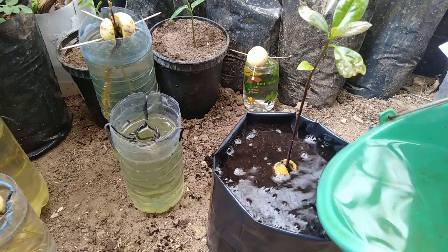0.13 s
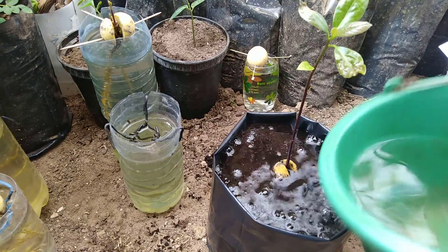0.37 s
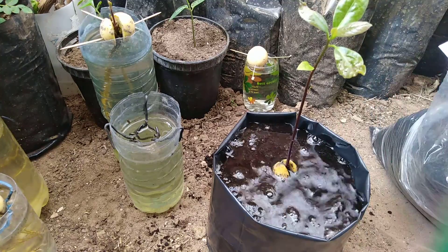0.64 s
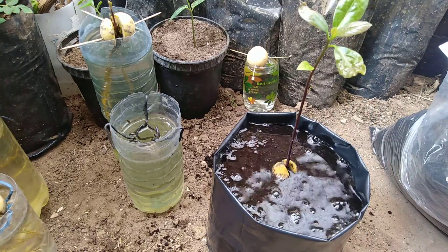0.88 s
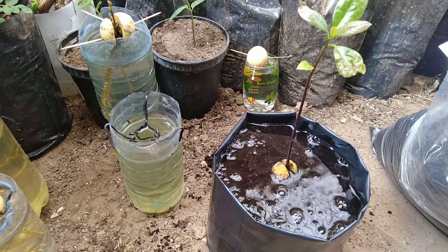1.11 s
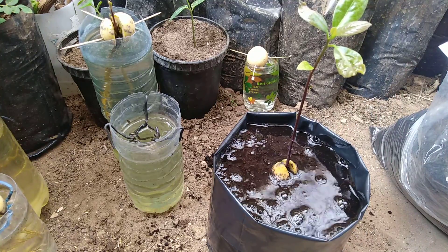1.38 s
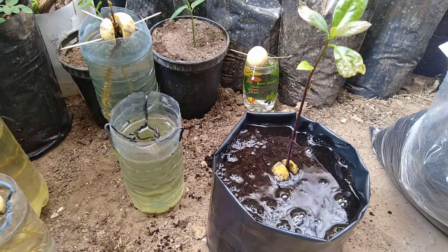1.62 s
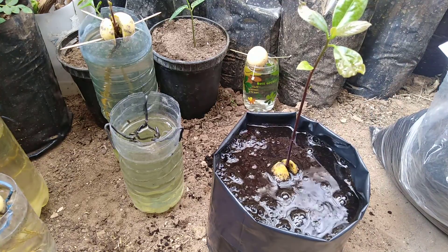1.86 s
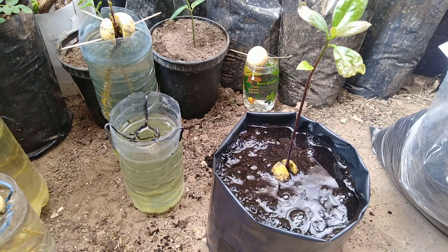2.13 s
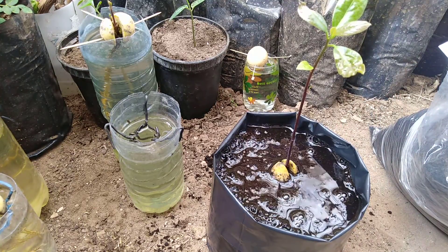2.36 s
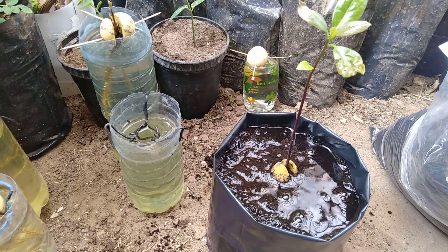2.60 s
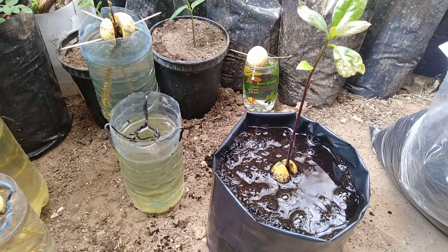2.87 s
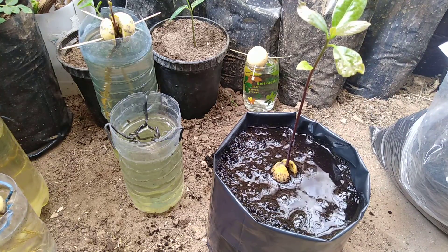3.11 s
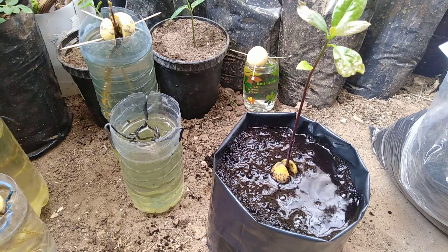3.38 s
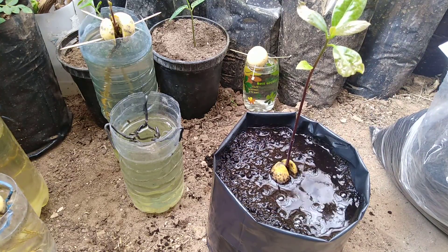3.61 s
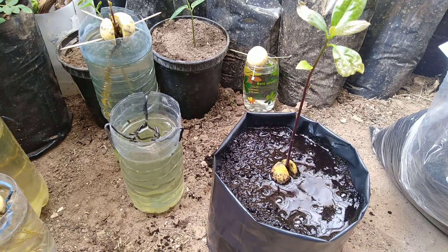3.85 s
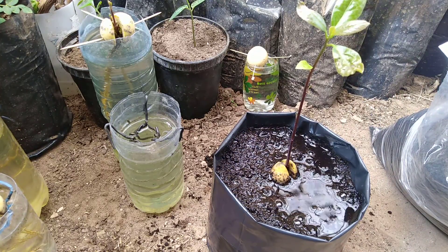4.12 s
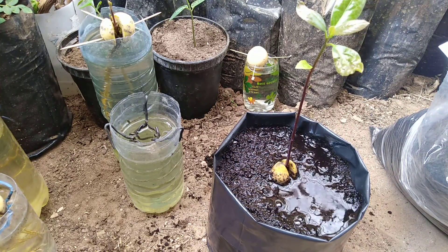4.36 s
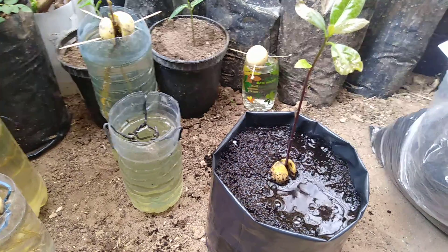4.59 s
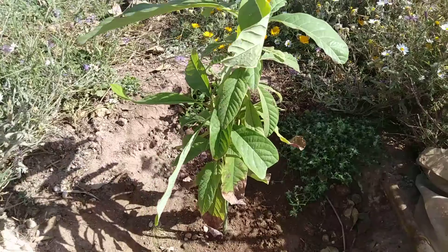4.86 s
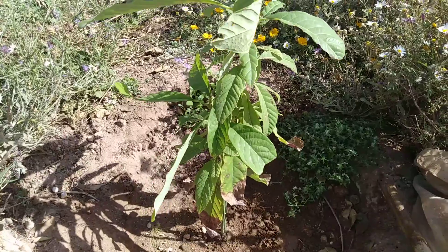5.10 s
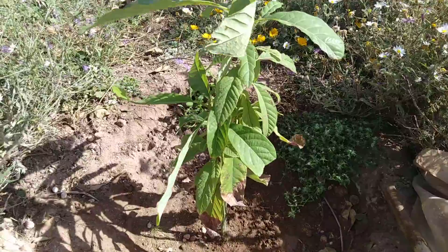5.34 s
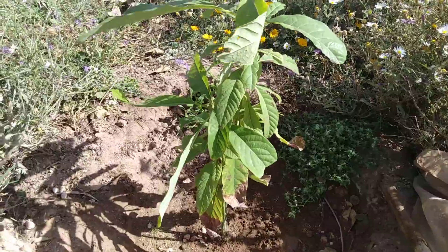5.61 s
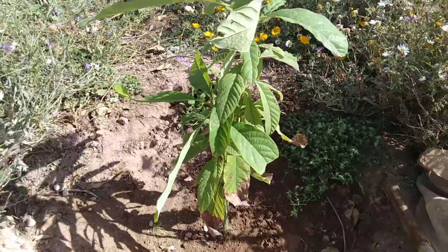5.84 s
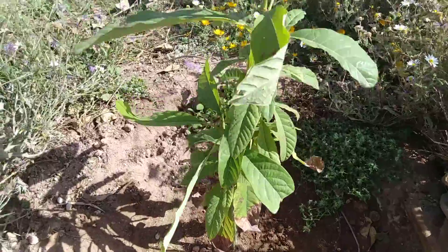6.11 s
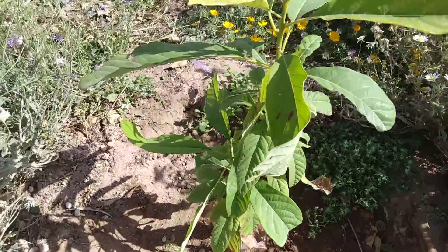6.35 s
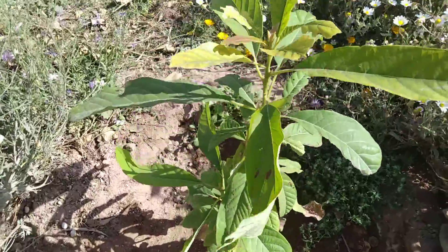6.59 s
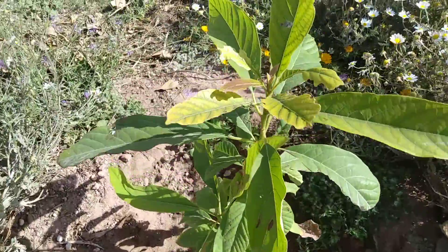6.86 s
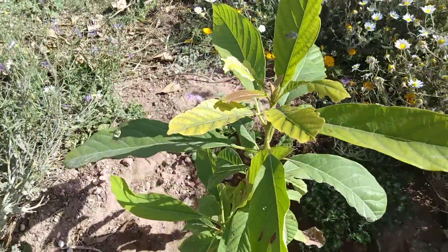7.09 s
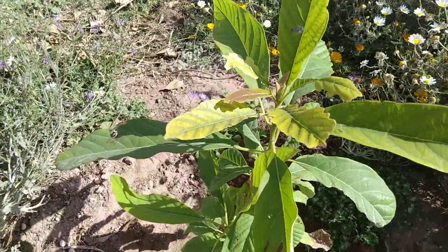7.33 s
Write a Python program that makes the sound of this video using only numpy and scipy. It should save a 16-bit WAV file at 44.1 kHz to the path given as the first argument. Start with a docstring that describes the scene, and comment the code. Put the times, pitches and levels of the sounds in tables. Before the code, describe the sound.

Close stereo sound of fingers working dry soil outdoors. From 0 to 0.7 s, light sandy rustles with small ticks, one fuller swish near 0.3 s. Around 1 s it almost stops, and a faint far bird gives a short falling chirp. Between 1.2 and 1.6 s strokes swell to a sharp snap at 1.4 and a crunch near 1.55. Short gritty scrapes follow at 2.2 and 2.7-3.1 s with dull pushes. From 3.4 s crunching thickens, with cracks and hollow knocks at 3.7-3.9; the strongest, densest crunch comes at 4.4, followed by a heavy muffled press to 4.9. Softer rustles and clod knocks run 5-5.5 s, a crisp burst at 5.9, then thinning. A weaker chirp at 6.45 sits in near silence with faint hiss and far rumble; small crackles lead to a brief rustle at 7.17, fading out.

```python
"""Fingers press and work dry soil close to a pair of microphones, outdoors.
Sand hisses, crumbs crunch, clods shift and the bed takes dull pushes: band noise under stroke envelopes.
Single lumps crack out of the rustle as short bursts; clods knock hollow as damped tones with grit.
Between strokes the air is nearly silent: faint hiss, a far rumble and a few far chirps as falling tones."""
import sys
import numpy as np
from scipy import signal
from scipy.fft import rfft, irfft, next_fast_len
from scipy.io import wavfile
from scipy.ndimage import uniform_filter1d

SR = 44100
rng = np.random.default_rng(int(sys.argv[2]) if len(sys.argv) > 2 else 0)


def nominal_scale(level):
    """Amplitude ratio for a level in decibels (scalar or array-like)."""
    x = np.asarray(level, float) / 20
    return 10 ** x


def pcm_store(signal):
    """Save signal as 16-bit PCM."""
    levels = np.round(np.clip(np.atleast_2d(signal), -1, 1) * 32767)
    wavfile.write(sys.argv[1], SR, levels.astype(np.int16).T)


N = 329427


def at_hz(points, hz):
    """A spectrum read on a log-frequency axis."""
    points_hz, values = np.array(points).T
    return np.interp(np.log(hz), np.log(points_hz), values)


def blend(columns, anchors_hz, hz):
    """The dB value at a pitch, between columns that stand for given pitches."""
    total_db = 0
    for unit, column in zip(np.eye(len(columns)), columns):
        total_db = total_db + np.interp(np.log(hz), np.log(anchors_hz), unit) * column
    return total_db


def drift(rate_hz):
    """Slow random wander of spread 1: twice low-passed noise, drawn at every 20th sample."""
    pole = np.exp(-40 * np.pi * rate_hz / SR)
    noise = rng.standard_normal(N // 20 + 4002)
    slow = signal.lfilter([1], [1, -2 * pole, pole * pole], noise)[4000:]  # settled part
    return np.interp(np.arange(N) / 20, np.arange(len(slow)), slow / slow.std())


def add(envelope, at_s, shape, lead):
    """Lay a shape onto an envelope, its sample number lead at the given time."""
    i = max(int(at_s * SR) - lead, 0)
    envelope[..., i:i + shape.shape[-1]] += shape[..., :N - i]


def soil():
    """Each band of grain sizes has its own rustle, and takes part in crumbles near its pitch and in cracks."""
    # strokes of the fingers through the soil: peak_s, rise_s, fall_s, sand_db, crumb_share_db
    stroke_rows = [(.118, 0.64, 0.53, -51, -7), (.33, 0.13, 0.096, -41, -8.5), (.44, 0.14, 0.2, -53, -6.5),
                   (.56, 0.11, 0.18, -52.5, -8), (1.002, 0.065, 0.022, -65, -4),
                   (1.068, 0.033, 0.49, -74.5, -24), (1.29, .11, 0.26, -53.5, -7),
                   (1.389, 0.11, 0.032, -46.5, -6), (1.55, 0.24, 0.028, -44.5, 3.5),
                   (1.572, 0.055, 0.022, -36, -2), (1.85, 0.025, 0.055, -52, -9.5),
                   (1.9, 0.044, 0.21, -60.5, -1), (2.155, 0.013, 0.16, -51, 4),
                   (2.237, 0.12, 0.089, -43.5, -2), (2.295, 0.035, 0.024, -39.5, -8),
                   (2.365, 0.096, 0.088, -48, -3.5), (2.692, 0.027, 0.046, -37.5, -10.5),
                   (2.76, 0.038, 0.06, -42, -1), (2.865, 0.09, 0.114, -43.5, 0),
                   (2.981, 0.19, 0.098, -43.5, 2.5), (3.13, 0.081, 0.032, -45.5, -1),
                   (3.43, 1, 0.22, -42.5, -2), (3.66, 0.068, 0.041, -57, -7),
                   (3.793, 0.12, 0.57, -42.5, -4.5), (4.192, 0.56, 0.21, -39.5, -1),
                   (4.39, 0.16, 0.053, -36.5, -2), (4.436, 0.088, 0.12, -27.5, -4),
                   (4.51, 0.071, 0.18, -42, -15), (4.693, 0.2, 0.34, -40.5, 2),
                   (4.935, 0.13, 0.14, -41.5, -3), (5.082, 0.14, 0.53, -46, -4.5),
                   (5.376, 0.088, 0.39, -47, -3.5), (5.73, 0.3, 0.46, -48, -5.5),
                   (5.909, 0.15, 0.15, -36, -2.5), (6.12, 0.94, 0.14, -51, -7),
                   (6.234, 0.101, 0.029, -58.5, -1.5), (6.352, 0.029, 0.056, -44.5, -1.5),
                   (6.45, 0.17, 0.19, -73.5, -3), (6.665, 0.049, 0.48, -69, -12),
                   (6.828, 0.06, 0.02, -55.5, -12), (6.88, 0.061, 0.051, -67.5, -3),
                   (6.98, 0.015, 0.014, -59, 17), (7.088, 0.03, .1, -48, -7),
                   (7.17, 0.12, 0.38, -42.5, -9.5), (7.34, 0.79, 0.075, -52.5, -3),
                   (7.46, 0.21, .1, -57, -3)]
    # the hand leans on the bed: peak_s, rise_s, fall_s, push_db, clod_share_db
    lean_rows = [(.164, 0.49, 0.51, -66, 7.5), (.54, 0.11, 0.11, -48.5, -28.5),
                 (1.3, 0.042, 0.063, -67.5, 11.5), (1.537, 0.3, 0.11, -44.5, -5),
                 (2.165, 0.036, 0.15, -40.5, -11), (2.235, 0.1, 0.32, -45, -10.5),
                 (2.76, 0.12, 0.39, -44.5, -8), (2.995, 0.49, 0.274, -43.5, -12.5),
                 (3.472, 0.51, 0.16, -48.5, -5.5), (3.809, 0.22, 0.095, -66, 16),
                 (4.2, 0.43, 0.14, -61, 13), (4.41, 0.14, 0.24, -36.5, -4.5),
                 (4.68, 0.13, 0.29, -34.5, -19.5), (4.77, 0.26, 0.37, -42, -10.5),
                 (5.09, 0.073, 0.23, -49, -2), (5.45, 0.36, 1, -74.5, 16.5), (5.915, 0.21, 0.35, -57, 8),
                 (6.354, 0.046, 0.15, -75, 15), (6.72, 0.15, 0.59, -100, 24),
                 (7.15, 0.19, 0.94, -72.5, 11.5)]
    # lumps that crack: peak_s, base_level_db, crumb_share_db, bright_share_db, base_length_ms
    crack_rows = np.array([(0.057, -47.5, -10, -3, 4.8), (0.115, -37.5, -4, -5, 1.6),
                           (0.126, -40, -2.5, 5.5, 3.3), (0.157, -50.5, -0.5, -7.5, 5),
                           (0.184, -43, -2.5, 3.5, 3), (0.274, -45, -4.5, 5, 2.2),
                           (0.284, -53.5, 9, -1, 1.3), (0.4236, -46, -13.5, -12, 5.9),
                           (0.6507, -52.5, 4, 0, 11.6), (0.6692, -44, -12.5, -5, 8.4),
                           (0.7092, -58, -7, -1, 6.8), (1.0003, -52, -14, 2.5, 7.1),
                           (1.1969, -54.5, -5, 2.5, 8.7), (1.2321, -61.5, -0.5, 3, 8.7),
                           (1.3987, -27.5, -16, -35, 0.62), (1.533, -32.5, -18, -17.5, 2.4),
                           (1.5396, -31, -10.5, -9.5, 7.1), (1.603, -62, 5, -19, 5),
                           (1.6695, -57, -12, -10, 5), (1.8392, -47.5, -14, -8, 4.9),
                           (1.8876, -49.5, -8, -6, 4.5), (1.935, -63, 4, 5, 9.4),
                           (2.051, -44.5, -12, -2, 4.4), (2.058, -65.5, 4, 6.5, 6.9),
                           (2.183, -41, -9.5, 7.5, 3), (2.23, -32.5, -8, 4, 2.6),
                           (2.444, -45.5, -1.5, -0.5, 5), (2.4745, -46.5, -3, 0.5, 7.9),
                           (2.688, -46, 3.5, 3, 1.39), (2.75, -44.5, 7, 4.5, 1.4), (2.85, -38, -1, 1, 9.8),
                           (2.8764, -39.5, 0.5, 9.5, 1.8), (2.9662, -42.5, -7.5, 0.5, 4.3),
                           (3.124, -62, 3.5, -4, 1.3), (3.218, -42, -15, -11.5, 4.2),
                           (3.381, -38.5, -10.5, 0.5, 6.9), (3.448, -45.5, -11, 8, 4.9),
                           (3.627, -49, 1, -3, 2.9), (3.69, -33, -7.5, -12.5, 1.9),
                           (3.752, -32, -21, -5.5, 2.5), (3.783, -46.5, -9, -5, 5.6),
                           (3.8013, -31, -14, -2, 3.9), (3.874, -33, -13.5, -4.5, 1.6),
                           (3.8892, -29, -6, -1, 0.73), (3.9171, -26, -10.5, -4, 2.4),
                           (4.075, -39.5, -10, -10.5, 1.8), (4.1179, -31.5, -11, -22, 1.6),
                           (4.164, -32, -2.5, -1, 1.2), (4.24, -44, 7, -2.5, 2.5),
                           (4.2621, -41, 6.5, -26, 3.4), (4.303, -38.5, -11.5, 8, 3),
                           (4.3187, -35.5, 1.5, -2.5, 4), (4.379, -30.5, -4.5, -1.5, 1.9),
                           (4.418, -28, 0.5, -2, 1.8), (4.431, -29.5, -4.5, 4.5, 3.3),
                           (4.449, -31.5, -2.5, -0.5, 1.7), (4.495, -33.5, -20, 2, 1.9),
                           (4.5245, -36.5, 0, 7, 1.9), (4.541, -46.5, -5, 3.5, 4),
                           (4.656, -40.5, 5, -4.5, 2.7), (4.681, -42, 1, -15.5, 2),
                           (4.704, -49, 3, -17, 2.7), (4.734, -44, 11, -28.5, 1.6),
                           (4.8201, -37.5, -6, -8.5, 2.8), (4.8579, -37.5, -3.5, -12, 2.3),
                           (4.893, -31, -20.5, -3.5, 3.8), (5.1461, -36, 2, 9.5, 0.76),
                           (5.498, -42, -5, 4.5, 1.8), (5.896, -34, -2.5, 5.5, 0.97),
                           (5.9125, -33, -20, -4, 4.4), (5.9215, -36.5, 1, -7.5, 3.2),
                           (5.9487, -40, -3.5, -15.5, 5), (6.005, -46, -2, -13, 9.2),
                           (6.127, -38.5, -8, 3, 5.8), (6.246, -50.5, -2.5, -27, 3.7),
                           (6.294, -67, -2, -2, 5.3), (6.6538, -62, -9, -11, 16), (6.828, -56, -5.5, 2, 17),
                           (6.973, -46.5, -11.5, -8, 8.1), (7.049, -62.5, 10, 10.5, 5),
                           (7.1748, -35, -6, -2, 1.7)])
    # where push, clods, crumbs and sand sound: pitch_hz
    sizes_hz = [80, 290, 1300, 5000]
    # likeness of left and right: pitch_hz, likeness (ratio)
    likeness_points = [(60, 0.98), (300, 0.91), (700, 0.9), (1400, 0.57), (2800, 0.055), (14000, 0.025)]
    # where the hand works: time_s, left_over_right_db (where the sides are unlike)
    hand_points = [(0.0, -8), (7.47, -4)]

    sand_db, crumb_db = swells(stroke_rows, curve=2.18)
    push_db, clod_db = swells(lean_rows, curve=1.98)
    levels_db = [push_db, clod_db, crumb_db, sand_db]
    small = crumbles(300, 7.5)
    together = drift(60)
    pans_db = 0.5 * rng.standard_normal(len(crack_rows))  # lumps lie to either side
    side_db = np.interp(np.arange(N) / SR, *np.transpose(hand_points))
    grains = nominal_scale(3.15 * rng.exponential(1, (2, N)))  # few large grains among many small
    grains = grains / np.sqrt(np.mean(grains ** 2))
    white = rng.standard_normal((2, 2, N))
    sides = np.array([[1], [-1]])
    edges_hz = np.geomspace(35, 16000, 20)
    out = np.zeros((2, N))
    for k, (low_hz, high_hz) in enumerate(zip(edges_hz, edges_hz[1:])):
        hz = np.sqrt(low_hz * high_hz)
        slow = 1 + 450 / hz  # big grains move more slowly

        crunch = np.zeros(N)
        near = np.abs(np.log2(small[:, 2] / hz)) < 2  # within two octaves
        for at_s, size_db, pitch_hz, ms in small[near]:
            shape, lead = burst(ms * slow, 0.25, -43.5, 4.1)
            band_db = size_db - 7.9 * np.log2(pitch_hz / hz) ** 2
            add(crunch, at_s, nominal_scale(band_db) * shape[:1200], lead)

        rustle = nominal_scale(1.4 * together + 2.5 * drift(24)) * grains[k % 2]
        motion = nominal_scale(blend(levels_db, sizes_hz, hz))
        envelope = motion * (0.49 * rustle + 0.54 * crunch) * np.ones((2, 1))

        shares_db = [crack_rows[:, 2] - 14, crack_rows[:, 2] + 7.3, 7.5, crack_rows[:, 3] + 6]
        crack_db = crack_rows[:, 1] + blend(shares_db, [330, 1300, 4500, 10500], hz)
        crack_db += 1.6 * rng.standard_normal(len(crack_rows))  # every lump rings in its own bands
        for (at_s, *_, ms), db, pan_db in zip(crack_rows, crack_db, pans_db):
            shape, lead = burst(max(ms, .6) * 0.3 * slow, 0.79, -16.5, 6.4)
            # one period early, ahead of the band filter's delay
            add(envelope, at_s - 1.0 / hz, nominal_scale(db + pan_db / 2 * sides) * shape, lead)

        alike = np.clip(at_hz(likeness_points, hz), 0, 1)  # long waves reach both microphones alike
        envelope = envelope * nominal_scale((1 - alike) * side_db / 2 * sides)
        shared, apart = white[k % 2]
        grit = np.sqrt(1 + alike) * shared + np.sqrt(1 - alike) * apart * sides
        # narrow size classes pack their level into few Hz
        share = nominal_scale(blend([16.1, 12.5, 9.09, 3.25], sizes_hz, hz))
        band = signal.butter(2, [low_hz, high_hz], "band", fs=SR, output="sos")
        out += share * signal.sosfilt(band, envelope * grit)
    return coloured(out)


def swells(rows, curve):
    """Each move ramps up to its peak and down; returns dB levels of its main and second sound."""
    trickle_db, trickle_s = np.array([[-32.5], [-33.5]]), 0.28  # loosened grains run on after a move
    rest_db = -103
    t, power = np.arange(N) / SR, np.zeros((2, N))
    for peak_s, rise_s, fall_s, db, share_db in rows:
        near = slice(max(int((peak_s - rise_s) * SR), 0), int((peak_s + fall_s) * SR))
        up, down = 1 + (t[near] - peak_s) / rise_s, 1 - (t[near] - peak_s) / fall_s
        ramp = np.clip(np.minimum(up, down), 0, 1)
        power[:, near] += (nominal_scale(db + np.array([[0], [share_db]])) * ramp ** curve) ** 2
    decay = np.exp(-2 / (trickle_s * SR))
    trickle = signal.lfilter([1 - decay], [1, -decay], power) * nominal_scale(trickle_db) ** 2
    return 10 * np.log10(power + trickle + nominal_scale(rest_db) ** 2)


def crumbles(base_per_s, spread_db):
    """Small collapses come in clumps; rows of at_s, size_db, pitch_hz, base_length_ms."""
    biggest_db = 7
    born = np.flatnonzero(rng.random(N) < base_per_s * nominal_scale(5 * drift(6)) / SR)
    u = rng.random((len(born), 3))
    size_db = np.minimum(-spread_db * np.log(u[:, 0]), biggest_db)
    pitch_hz = 150 * 70 ** u[:, 1]
    return np.c_[born / SR, size_db, pitch_hz, .7 + 2.5 * u[:, 2]]


def burst(ms, swell, tail_db, tail_ms):
    """A break creaks up to its peak, dies, and leaves a trickle of loose grains; returns shape and lead."""
    lead = 441
    t_ms = np.arange(-lead, 2205) * 1000 / SR
    away_ms = np.abs(t_ms)
    fall = np.exp(-away_ms / ms)
    after = fall + nominal_scale(tail_db) * (np.exp(-away_ms / tail_ms) - fall)
    before = np.exp(-away_ms / min(ms * swell, .9))
    return np.where(t_ms < 0, before, after), lead


def coloured(x):
    """Hollows and echoes of the ground colour the sound, differently at each side; the left is later."""
    # soil spectrum: pitch_hz, relative_density_db (per Hz)
    soil_points = [(24, -43), (40, -10), (74, -7.5), (220, -3.5), (340, 0), (430, -5.5), (510, -11),
                   (640, -4.5), (860, -2), (1010, -7.5), (1180, -11), (1620, -5.5), (1890, -9.5),
                   (2250, -7), (3020, -5.5), (5310, -5), (12000, -6), (14200, -13)]
    # balance of the sides: pitch_hz, left_over_right_db
    balance_points = [(300, -0.5), (750, 4.5), (1200, -1), (2000, -1), (3300, 3.5), (5500, 3), (9000, 3),
                      (15000, -9.5)]
    left_lag_ms = 0.14
    size = next_fast_len(N + 8192)
    hz = np.arange(size // 2 + 1) * SR / size + 1
    balance_db = at_hz(balance_points, hz) / 2 * np.array([[1], [-1]])
    db = at_hz(soil_points, np.clip(hz, 30, 14000)) + 6 + balance_db
    cepstrum = irfft(np.log(nominal_scale(db)), size)  # minimum phase: nothing rings before the contact
    cepstrum[:, 1:size // 2] *= 2
    cepstrum[:, size // 2 + 1:] = 0
    lag = np.exp(-2j * np.pi * hz * left_lag_ms / 1000 * np.array([[1], [0]]))
    return irfft(rfft(x, size) * np.exp(rfft(cepstrum)) * lag, size)[:, :N]


def knocks():
    """Hollow clods ring briefly at their own pitch, a little differently at each side."""
    # clods that knock hollow: start_s, level_db (envelope peak), pitch_hz
    knock_rows = [(1.196, -48.5, 1740), (1.737, -61.5, 824), (1.99, -46, 706), (3.688, -28.5, 1500),
                  (3.914, -28.5, 1580), (4.319, -28.5, 1620), (4.784, -27, 764), (4.99, -40, 880),
                  (5.075, -36.5, 810), (5.32, -39.5, 775), (5.418, -39, 900), (6.825, -48.5, 820),
                  (6.972, -48, 785)]
    peak_cycles = 1  # cycles from the start to the envelope's peak
    out, t = np.zeros((2, N)), np.arange(SR // 20) / SR
    turns = rng.standard_normal((len(knock_rows), 2, 1))
    for (start_s, db, hz), side_turn in zip(knock_rows, turns):
        grit = uniform_filter1d(rng.standard_normal((2, len(t))), size=5)  # loose grains jump with it
        u = t * hz / peak_cycles
        ring = np.sin(2 * np.pi * hz * t + .5 * side_turn)
        add(out, start_s, nominal_scale(db) * np.e * u * np.exp(-u) * (ring + grit), 0)
    return out


def chirps():
    """Far birds: falling tones, strongest near their start, hoarse from a smoothed-noise amplitude."""
    # far chirps: start_s, length_s, start_hz, end_hz, base_level_db
    chirp_rows = [(1.054, 0.12, 5520, 3740, -57), (6.436, 0.15, 4940, 3340, -62.5)]
    out = np.zeros((2, N))
    for start_s, length_s, start_hz, end_hz, db in chirp_rows:
        u = np.linspace(0, 1, round(length_s * SR))
        phase = 2 * np.pi * np.cumsum(start_hz + (end_hz - start_hz) * u ** 0.36) / SR
        noise = rng.standard_normal((2, SR))
        blur = uniform_filter1d(uniform_filter1d(noise, size=44), size=44)[:, :len(u)] * 9
        envelope = np.minimum(20 * u, 1) * (1 - u) ** 2.2
        add(out, start_s, nominal_scale(db) * envelope * blur * np.sin(phase), 0)
    return out


def air():
    """Faint hiss, apart at each side, and a far low rumble of drifting level, the same at both."""
    hiss_db, rumble_mid_db = -100, -83
    band = signal.butter(2, [50, 95], "band", fs=SR, output="sos")
    rumble = signal.sosfilt(band, rng.standard_normal(N))
    hiss = nominal_scale(hiss_db) * rng.standard_normal((2, N))
    return hiss + nominal_scale(rumble_mid_db + 4 * drift(4.7)) * rumble / rumble.std()


def scene():
    """Soil, knocks, birds and still air."""
    return soil() + knocks() + chirps() + air()


def top_cut(x):
    """Nothing passes above the cut-off."""
    return signal.sosfilt(signal.butter(12, 15590, fs=SR, output="sos"), x)


def record(dry):
    """The top is cut steeply and the microphones drop the lowest bass."""
    top_stop_hz, bass_cut_hz = 14500, 52
    cut = signal.sosfilt(signal.cheby2(10, 26, top_stop_hz, fs=SR, output="sos"), dry)
    cut = signal.sosfilt(signal.butter(2, bass_cut_hz, "high", fs=SR, output="sos"), cut)
    return top_cut(cut)


dry = scene()
out = record(dry)
pcm_store(out)
```